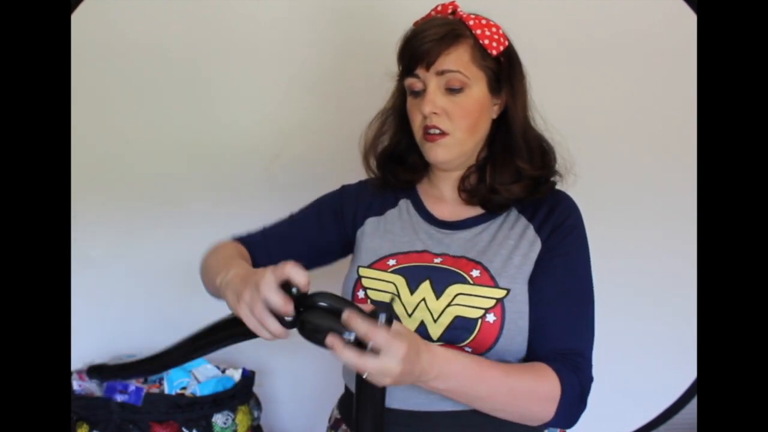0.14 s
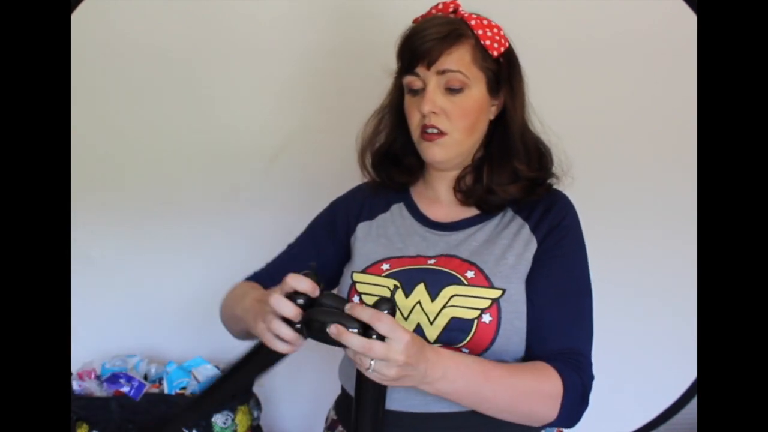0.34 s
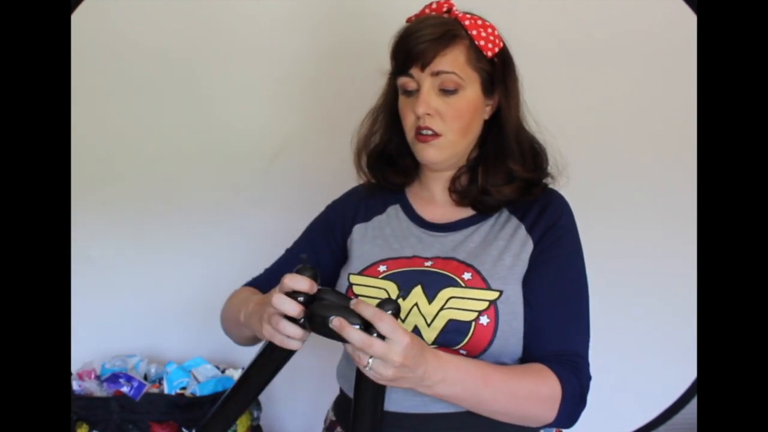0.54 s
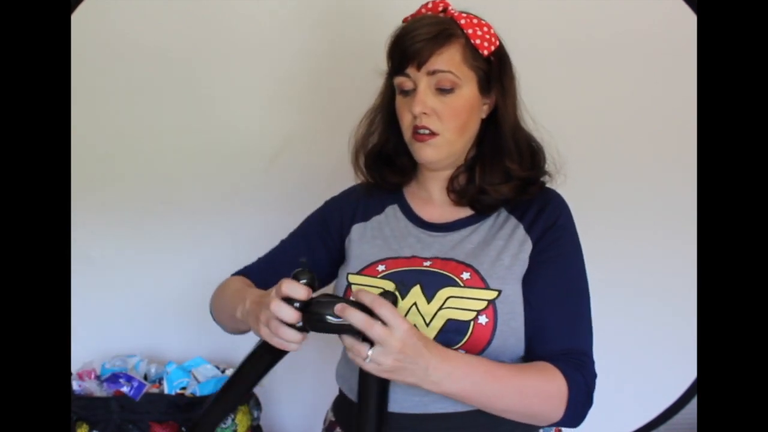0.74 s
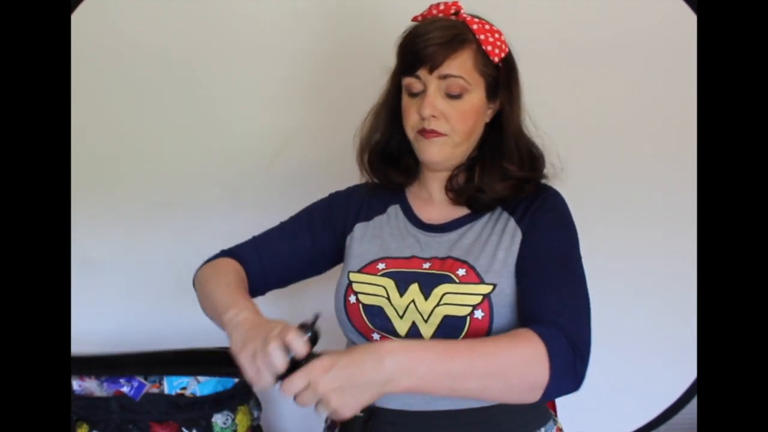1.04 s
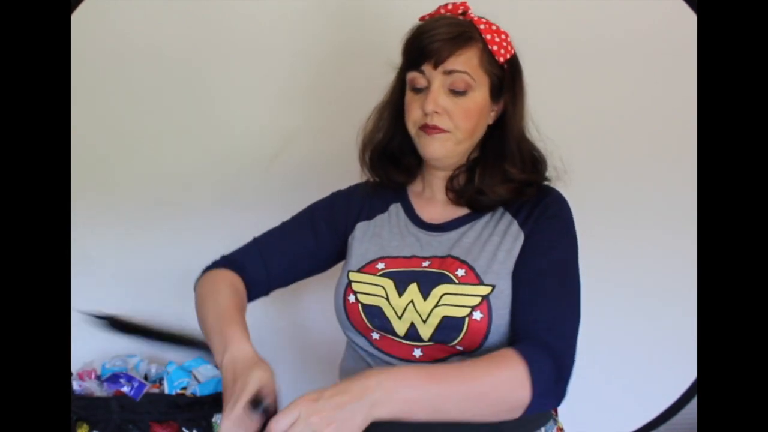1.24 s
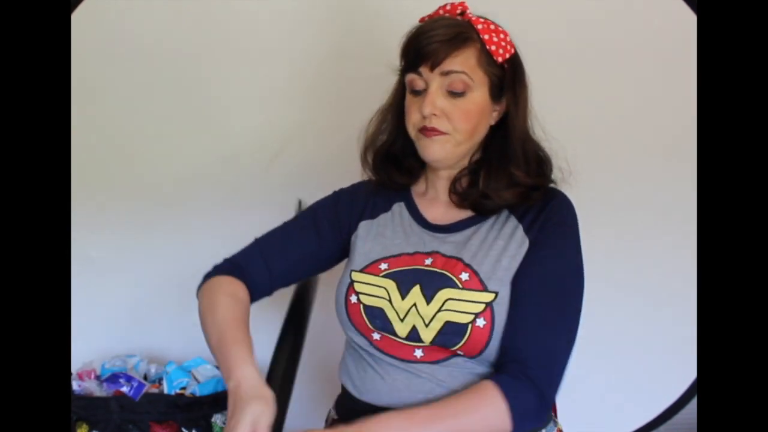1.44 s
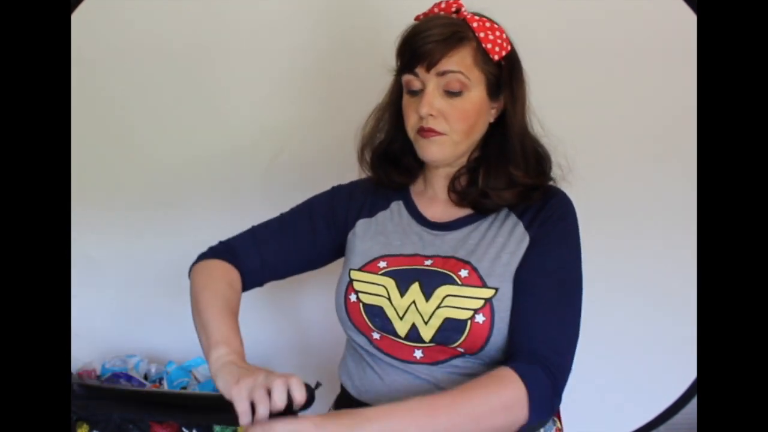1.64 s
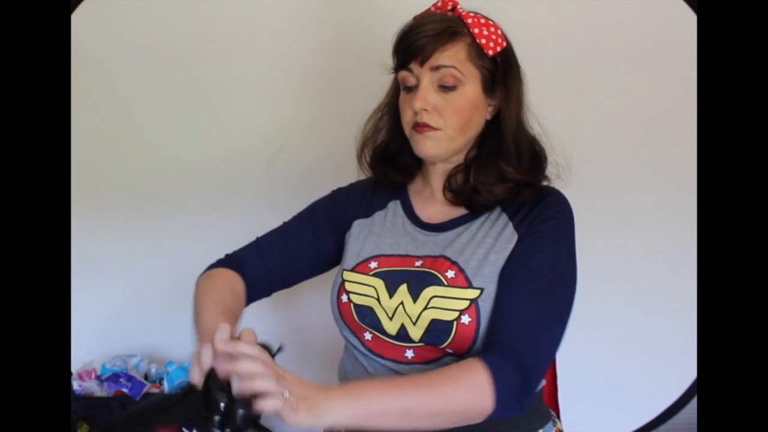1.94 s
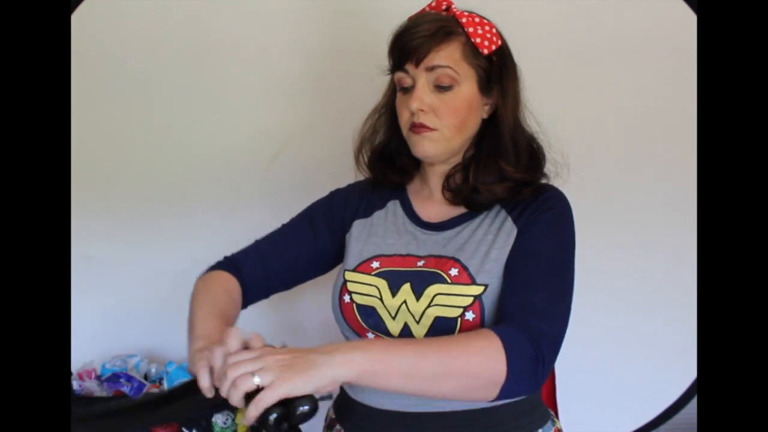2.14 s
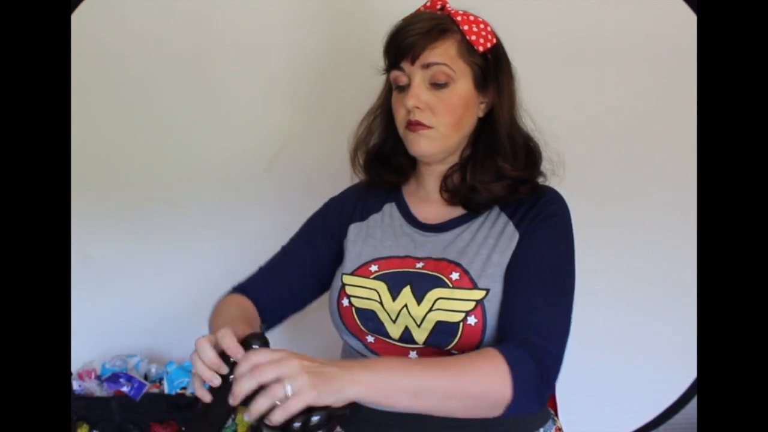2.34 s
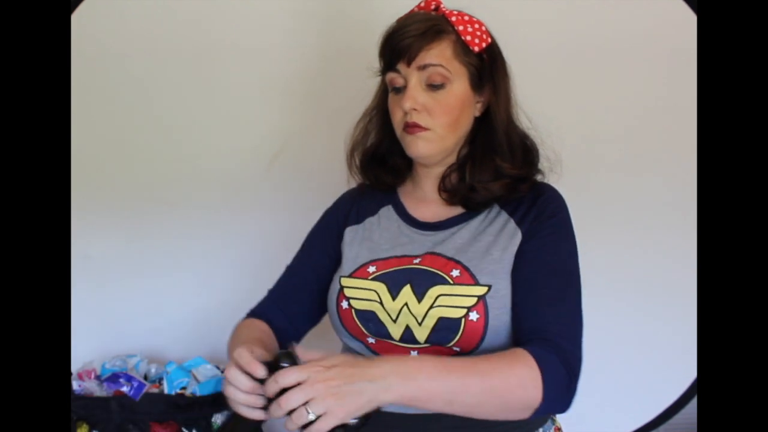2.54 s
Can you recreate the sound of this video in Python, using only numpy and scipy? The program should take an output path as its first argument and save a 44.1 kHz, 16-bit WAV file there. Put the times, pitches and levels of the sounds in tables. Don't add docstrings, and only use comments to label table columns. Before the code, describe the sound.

Long rubber balloons are twisted by hand: a loud burst of bright creaks and snaps, then hollow groans with a brief squeal, more scattered squeaky bursts, soft bumps, all close to the microphone in a small room.

```python
import sys
import numpy as np
from scipy import signal
from scipy.fft import rfft, irfft, next_fast_len
from scipy.io import wavfile
from scipy.ndimage import uniform_filter1d

SR = 44100
rng = np.random.default_rng(int(sys.argv[2]) if len(sys.argv) > 2 else 0)


def level_to_linear(level):
    exponent = np.asarray(level, float) / 20
    return 10 ** exponent


def digitize_waveform(pressure):
    field = np.atleast_2d(pressure).T
    bounded = np.clip(field, -1, 1)
    quanta = np.round(bounded * 32767).astype(np.int16)
    wavfile.write(sys.argv[1], SR, quanta)


N = 119070


def along(points, hz):
    point_hz, value = np.transpose(points)
    return np.interp(np.log(hz + 1), np.log(point_hz + 1), value)


def filtered(x, response):
    m = next_fast_len(N + SR // 2)
    return irfft(rfft(x, m) * response(np.fft.rfftfreq(m, 1 / SR)), m)[..., :N]


def resonance(f, center_hz, width_hz):
    return 1j * f * width_hz / (center_hz ** 2 - f * f + 1j * f * width_hz)


def unit(x):
    return x / np.sqrt(np.mean(x ** 2) + 1e-20)


def lay(start_s, shapes):
    size = shapes.shape[1]
    first = np.clip(np.round(start_s * SR).astype(int), 0, N)
    at = first[:, None] + np.arange(size)
    return np.bincount(at.ravel(), shapes.ravel(), N + size + 1)[:N]


# frequency in Hz, density in dB per Hz.
HUM_COLOUR = [(12, -40), (25, -12), (90, -6.5), (182, -5), (472, -2.5), (3250, 1), (9950, -13),
              (14300, -30)]


def hum():
    return level_to_linear(-40) * unit(filtered(rng.standard_normal(N), lambda f: level_to_linear(along(HUM_COLOUR, f))))


# frequency in Hz, 60 dB decay time in seconds.
ROOM_DECAY = [(150, 0.29), (700, 0.35), (3000, 0.4), (10000, 0.16)]


def room(x):
    level_db, delay_s, stretch = -6.5, .004, 8192
    out = np.zeros(N + 2 * SR)
    for a in range(0, N, stretch):
        hz, t, z = signal.stft(rng.standard_normal(SR * 3 // 4), SR, nperseg=256)
        decay = level_to_linear(-60 * t / along(ROOM_DECAY, hz)[:, None])
        tail = signal.istft(z * decay, SR, nperseg=256)[1]
        wet = signal.fftconvolve(x[a:a + stretch], tail / np.linalg.norm(tail))
        out[a + int(delay_s * SR):][:len(wet)] += wet
    return level_to_linear(level_db) * out[:N]


# start in seconds, peak in dB, fade in seconds.
BUMPS = [
    (.001, -37, 0.049),
    (0.349, -36, 0.032),
    (0.497, -21, 0.031),
    (1.06, -40, 0.059),
    (1.42, -36, 0.026),
    (1.801, -38, 0.052),
    (1.956, -24.5, 0.064),
    (2.174, -32.5, 0.056),
]


def bumps():
    start_s, db, fade_s = np.transpose(BUMPS)[:, :, None]
    t = np.arange(SR // 4) / SR
    swell = np.exp(-t / fade_s) * (1 - np.exp(-t / 0.0039))
    puffs = rng.standard_normal((len(BUMPS), len(t))) * level_to_linear(db + 14.5) * swell
    return filtered(lay(start_s[:, 0], puffs), lambda f: resonance(f, 111, 114) ** 2)


SONG_OVERTONES_DB = [0.5, -8.5, -26, -17]


def sing(pitch_hz, level_db, overtones_db):
    shake = unit(uniform_filter1d(rng.standard_normal(N), size=130))
    turn = 2 * np.pi * np.cumsum(pitch_hz * (1 + 0.0312 * shake)) / SR
    partials = sum(level_to_linear(db) * np.sin((k + 1) * turn) for k, db in enumerate(overtones_db))
    return np.sqrt(2) * level_to_linear(level_db) * partials


# time in seconds, pitch in Hz, level in dB.
SONG = [
    (.627, 625, -40),
    (.632, 626, -16),
    (.642, 618.5, -13),
    (.65, 692, -16),
    (0.657, 754, -19),
    (.678, 769, -29),
    (.695, 770, -51),
]


def song():
    t = np.arange(N) / SR
    s, hz, db = np.transpose(SONG)
    return sing(np.interp(t, s, hz), np.interp(t, s, db, -200, -200), SONG_OVERTONES_DB)


# start in seconds, length in seconds, pitch in Hz, level in dB.
SQUEAKS = [
    (1.034, 0.027, 3210, -28.5),
    (.556, 0.036, 750, -34.5),
    (.35, 0.035, 480, -22.5),
    (1.1, 0.015, 1100, -24.5),
    (1.855, 0.013, 1800, -37),
    (.64, 0.049, 820, -23.5),
    (.63, 0.026, 2600, -30),
]


def squeaks():
    t = np.arange(N) / SR
    out = np.zeros(N)
    for start_s, length_s, hz, db in SQUEAKS:
        swell = np.sin(np.pi * np.clip((t - start_s) / length_s, 0, 1))
        out += swell * sing(hz, db, SONG_OVERTONES_DB[:2])
    return out


CRACK_T60_S = 0.0042


def slips(start_s, db, hz, q, crack_db, t60_s, size):
    t = np.arange(size) / SR
    fade = np.exp(-np.pi * hz[:, None] * t / q)
    turn = 2 * np.pi * hz[:, None] * t
    ring = np.sin(turn) * fade + level_to_linear(-12.5) * np.sin(2.23 * turn) * fade ** 2
    ring = ring - fade * ring.sum(1, keepdims=True) / fade.sum(1, keepdims=True)
    k = np.arange(128)
    crack = rng.standard_normal((len(start_s), 128)) - 1.88 * (k < 2)
    crack = crack * level_to_linear(-60 * k / SR / t60_s)
    crack = 3.34 * crack / np.linalg.norm(crack, axis=1, keepdims=True)
    rings = lay(start_s, level_to_linear(db)[:, None] * ring)
    cracks = lay(start_s, level_to_linear(db + crack_db)[:, None] * crack)
    return np.array([rings, cracks])


def runs(table, gap_s, rise_s, start, q, level_db, size, count):
    start_s, db, hz, fade_s, crack_db = np.transpose(table)[:, :, None]
    u = rng.standard_normal((len(table), 3, count))
    late = np.cumsum(gap_s / 2 * np.exp(.3 * u[:, 0]), 1)
    late -= late[:, :1]
    swell = 1 - (1 - start) * np.exp(-late / rise_s)
    shape = np.exp(-(late / fade_s) ** 1.64) * swell
    size_db = db + level_db + 20 * np.log10(shape + 1e-9)
    size_db = size_db + 1.8 * u[:, 1] * (late > 0) - 3 * (np.arange(count) % 2)
    pitch_hz = hz * np.exp(0.074 * u[:, 2])
    crack_db = crack_db + 0 * late
    return slips((start_s + late).ravel(), size_db.ravel(), pitch_hz.ravel(), q, crack_db.ravel(),
                 CRACK_T60_S, size)


# resonance in Hz, width in Hz, level in dB.
CHAMBERS = [(252, 35, -3), (363, 17, -2), (509, 61, 4.5), (597, 50, -1.5), (765, 49, 1)]


def chambers(f):
    return sum((-1) ** k * level_to_linear(db) * resonance(f, hz, width_hz)
               for k, (hz, width_hz, db) in enumerate(CHAMBERS))


# time in seconds, level in dB, share of the chambers in dB.
RUB = [(0, -23, -5), (.16, -18, -10.5), (.3, -27.5, 4.5), (.47, -29.5, -16), (.6, -39, -18),
       (.74, -22, -3.5), (.88, -36.5, 5), (1.0, -37, -0.5), (1.1, -26, -14), (1.25, -27, -12),
       (1.5, -29, -4), (1.75, -32.5, -9.5), (1.95, -34, -4), (2.15, -41.5, 2), (2.299, -26, -9),
       (2.5, -29, -2), (2.62, -40, -7), (2.7, -31.5, 3.5)]


def rub():
    slips_per_s = 1500
    s, db, share_db = np.transpose(RUB)
    at = np.sort(rng.random(int(slips_per_s * N / SR))) * N / SR
    u = rng.standard_normal((2, len(at)))
    size_db = np.interp(at, s, db) - 3.5 + 3 * u[0]
    pitch_hz = 1900 * np.exp(0.43 * u[1])
    skin = slips(at, size_db, pitch_hz, 1.8, 0.5 + 0 * at, CRACK_T60_S, size=96)
    push = level_to_linear(size_db + np.interp(at, s, share_db) + 28) * np.sign(u[1])
    skin[0] += filtered(lay(at, push[:, None]), chambers)
    return skin


# start in seconds, peak in dB, ring in Hz, fade in seconds, crack in dB.
GROANS = [(.001, -9.5, 282, 0.013, -0.5), (.175, -29, 258, 0.013, -10), (.2, -15, 620, 0.047, 0),
          (.332, -14.5, 272, 0.045, 2.5), (.35, -10.5, 484, 0.025, -0.5), (.497, -12, 310, 0.023, -7),
          (.505, -14.5, 510, 0.015, -1), (.555, -18.5, 750, 0.047, -4), (.628, -5, 720, 0.051, -6),
          (.804, -9.5, 697, 0.028, -13), (1.036, -17, 626, 0.058, 2), (1.39, -26, 585, 0.035, 12),
          (1.528, -12, 650, 0.0086, 0.5), (1.628, -22, 371, 0.054, -19), (1.954, -8, 470, 0.027, 1),
          (1.962, -12.5, 250, 0.051, -25), (1.984, -12, 414, 0.029, -8), (2.019, -19, 410, 0.047, 5),
          (2.241, -18, 327, 0.017, -20), (2.42, -21.5, 262, 0.027, -12), (2.493, -14.5, 390, 0.016, 2),
          (2.545, -21, 440, 0.017, -17)]


def groans():
    return runs(GROANS, gap_s=.0042, rise_s=0.0073, start=0.51, q=3.3, level_db=-0.5, size=768, count=48)


# start in seconds, peak in dB, ring in Hz, fade in seconds, crack in
# dB.
CREAKS = [(.125, -10, 2280, 0.067, 2), (.174, -4, 2800, 0.028, 5.5), (.197, 3.5, 2150, 0.023, -0.5),
          (.23, -5.5, 1690, 0.032, -3), (.529, -12, 2640, 0.019, 6), (.806, -5.5, 2650, 0.033, 3.5),
          (1.033, -9, 3220, 0.047, -7.5), (1.0927, -9.5, 1550, 0.042, 1), (1.1435, -12, 1570, 0.019, 1.5),
          (1.1895, -8.5, 1280, 0.043, -3.5), (1.272, -1.5, 1410, 0.035, -3.5),
          (1.2893, -6, 2900, 0.054, 1.5), (1.381, -8.5, 2050, 0.034, 8), (1.397, -1.5, 1140, 0.023, 3),
          (1.4194, -1, 3540, 0.036, -1), (1.683, -16, 1335, 0.039, 5), (1.7798, -12, 3330, 0.012, -17),
          (1.8139, -8, 2960, 0.045, -4.5), (1.8445, -7.5, 1470, 0.036, 6.5),
          (1.955, -3.5, 1190, 0.018, -10), (2.326, -9.5, 2800, 0.032, 1.5), (2.38, -2, 2270, 0.027, -0.5),
          (2.421, -7.5, 2620, 0.031, -2), (2.54, -7, 4200, 0.024, -4), (2.539, -4.5, 2450, 0.012, -2),
          (.076, -5, 3400, 0.034, -4.5), (.334, -9, 1590, 0.053, -2), (0.4658, -14, 1480, 0.033, -2.5),
               (0.631, -5.5, 1900, 0.027, -18), (0.755, -11.5, 1370, 0.016, -2),
               (.81, -3.5, 1450, 0.023, -7), (1.065, -7, 1680, 0.033, -13), (1.53, -12.5, 1130, 0.02, 5.5),
               (1.345, -11, 2430, 0.077, 5.5), (1.636, -15.5, 1400, 0.042, -3),
               (2.239, -13, 1640, 0.013, -1.5), (2.2986, -18, 2980, 0.028, 3),
               (2.6408, -13.5, 2350, 0.051, -2.5), (2.6613, -9.5, 1300, 0.021, -3)]


def creaks():
    return runs(CREAKS, gap_s=.003, rise_s=0.0015, start=.9, q=4.5, level_db=-7.5,
                size=192, count=56)


# start in seconds, peak in dB, ring in Hz, crack in dB.
SNAPS = [(.176, -3, 2190, 1), (0.1856, 1.5, 2580, 1), (.207, 1, 2880, -2), (0.2223, -5, 3200, -5),
         (0.2584, -9, 4000, 0), (0.2621, -4, 2900, 0), (0.3383, -16, 1760, 7), (0.5299, -11, 1760, -9),
         (.6329, -7, 726, 1), (.6365, -3.5, 744, -9), (0.715, -7, 1000, 6), (2.38, -6, 2300, 5),
         (0.7561, -12, 850, 1), (0.8048, -3.5, 630, 2), (0.8137, -3.5, 1520, 4), (.8213, -2.5, 674, -4),
         (0.8349, -4, 2540, -4), (0.9304, -16, 3900, -3), (1.0722, -7.5, 1430, -1), (1.094, -6, 1430, -19),
         (1.1446, -10, 1340, -1), (1.1914, -7.5, 1330, -1), (1.2683, -2.5, 1620, 1),
         (1.3275, -6.5, 1860, -6), (1.346, -16, 1890, 4.5), (1.3921, -6, 1900, 1), (1.4199, 1, 2820, 1),
         (1.452, -17, 1870, 5), (1.5287, -7.5, 720, 2), (1.6836, -8, 3200, -5), (1.7801, -12, 3350, -6),
         (1.814, -13.5, 2930, -2), (1.8434, -6, 1450, 7.5), (1.9542, -16, 1630, 6), (1.958, -3.5, 1510, 3),
         (1.9711, -6.5, 785, -20), (2.018, -18, 1500, 3), (2.1824, -17, 1620, -10), (2.2411, -18, 1680, -2),
         (2.3, -18, 3000, 1), (2.3245, -5.5, 2470, -1.5), (2.3846, -9, 2280, 0), (2.3873, 0, 1470, 0.5),
         (2.3919, -3, 1320, 2), (2.3945, -3.5, 1480, 2), (2.4038, -3.5, 1960, 1.5), (2.4269, 0.5, 2520, -5),
         (2.4508, -6, 2580, -6), (2.535, -2.5, 2380, 4), (2.6628, -9.5, 2500, -11)]


def snaps():
    start_s, db, hz, crack_db = np.transpose(SNAPS)
    return slips(start_s, db - 2.5, hz, 5.1, crack_db, 0.002, size=256)


# frequency in Hz, density in dB per Hz.
CRACK_COLOUR = [(180, -9), (300, -9), (1060, -4), (1190, -0.5), (1390, -4.5), (2000, -3.5), (8640, -12.5),
                (16000, -19.5)]


def balloons():
    rings, cracks = rub() + groans() + creaks() + snaps()
    both = rings + filtered(cracks, lambda f: level_to_linear(along(CRACK_COLOUR, f) + 10.5))
    low_hz = 163
    return filtered(both, lambda f: (f * f / (low_hz ** 2 - f * f + 1.5j * f * low_hz)) ** 2)


def scene():
    near = balloons() + bumps() + song() + squeaks()
    return (near + room(near) + hum())[None]


def top_cut(x):
    return signal.sosfilt(signal.butter(12, 16440, fs=SR, output="sos"), x)


def final_response(f):
    low_cut = f / (f - 69.4j)
    air = 1 / (1 + (f / 12570) ** 10.2)
    shelf = level_to_linear(-9 * (f > 15400))
    return (f < 16300) * shelf * low_cut * air


def record(dry):
    knee = 8
    clipped = dry / (1 + np.abs(signal.hilbert(dry)) ** knee) ** (1 / knee)
    return top_cut(filtered(clipped, final_response))


dry = scene()
out = record(dry)
digitize_waveform(out)
```